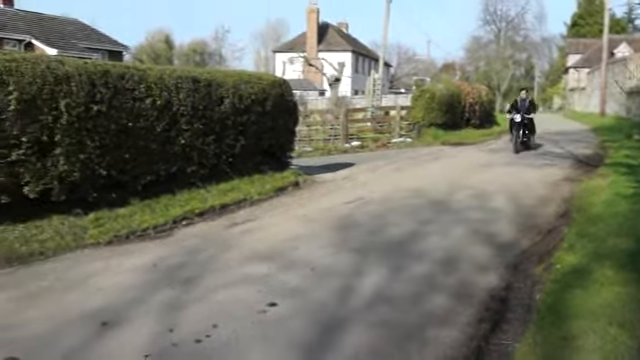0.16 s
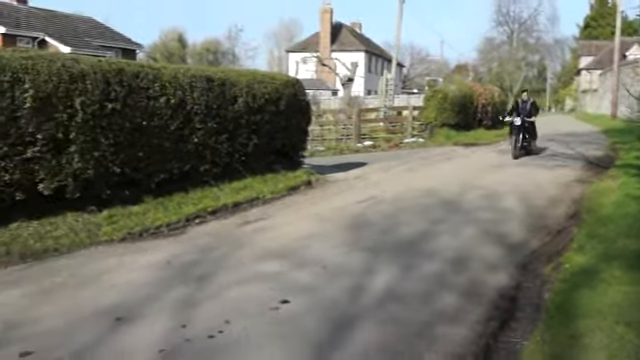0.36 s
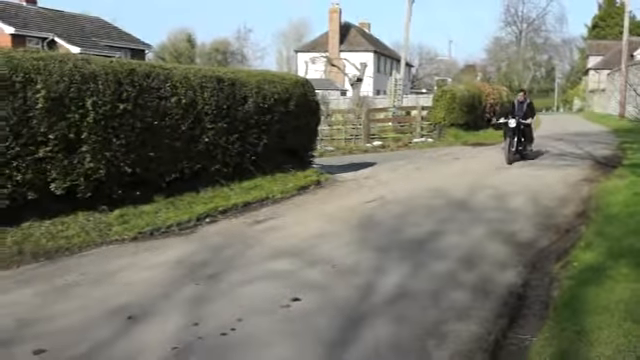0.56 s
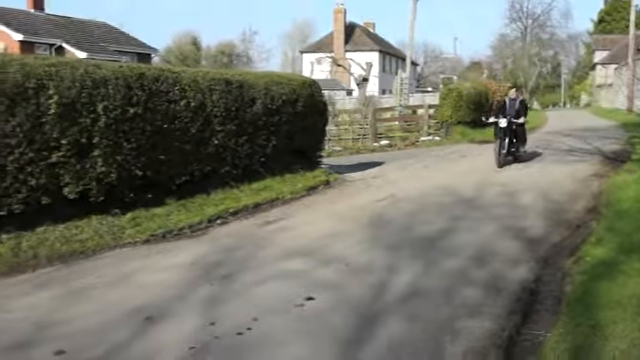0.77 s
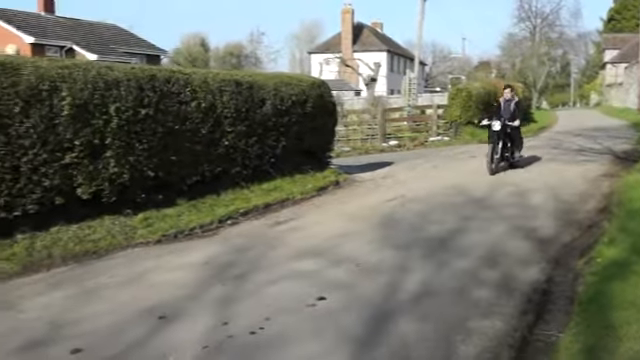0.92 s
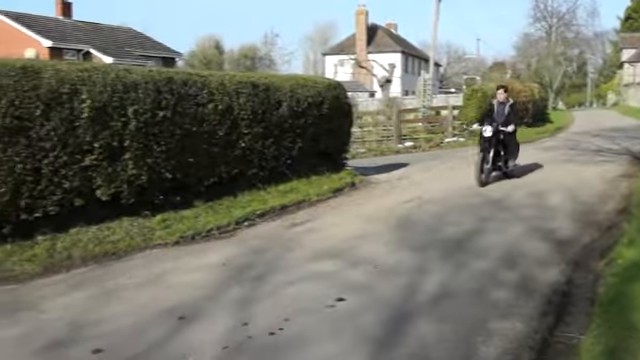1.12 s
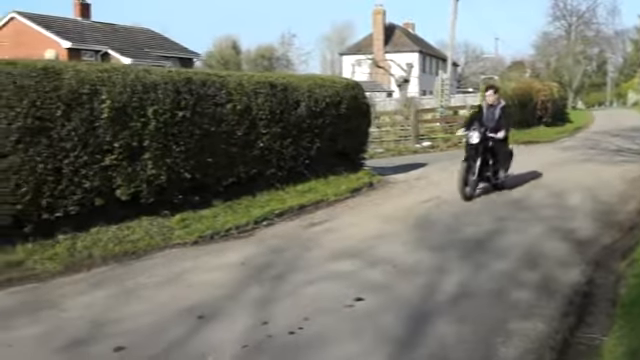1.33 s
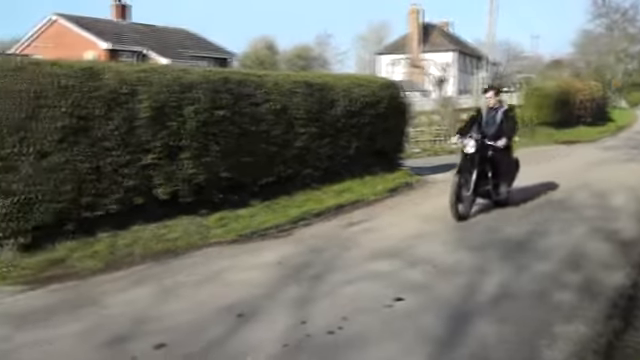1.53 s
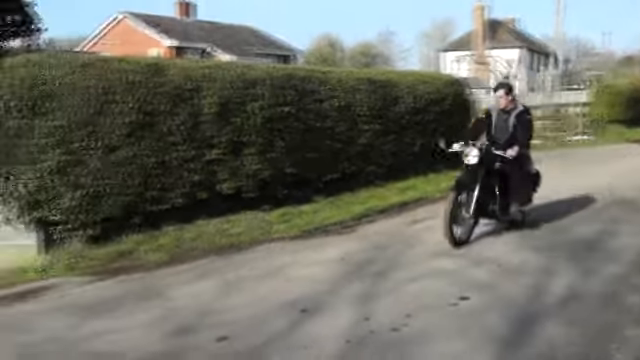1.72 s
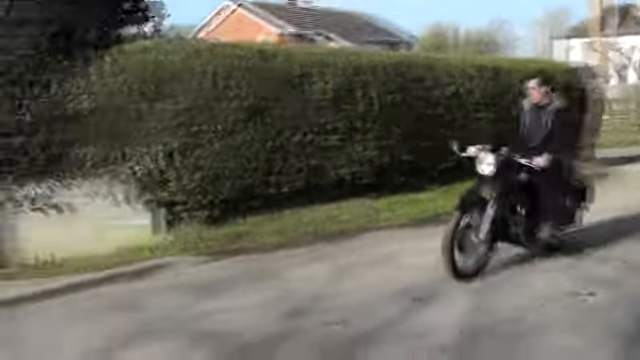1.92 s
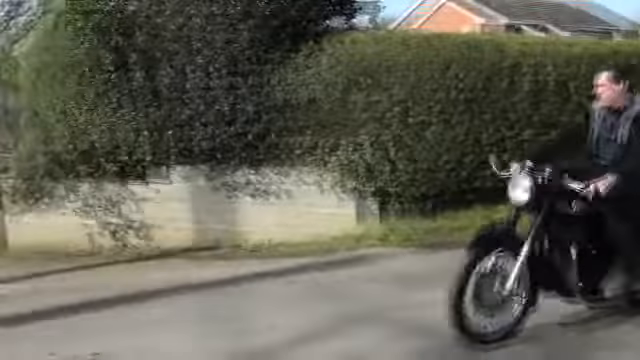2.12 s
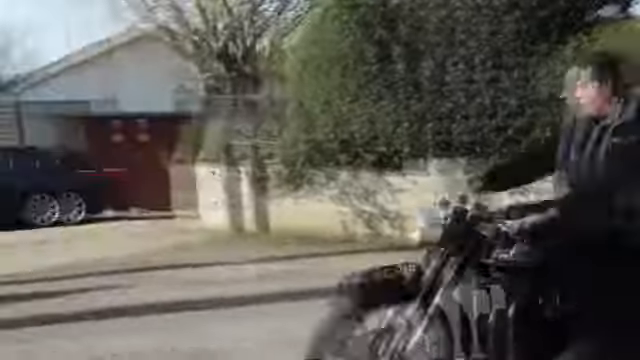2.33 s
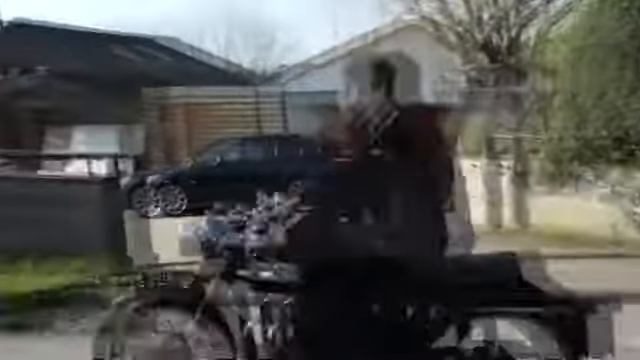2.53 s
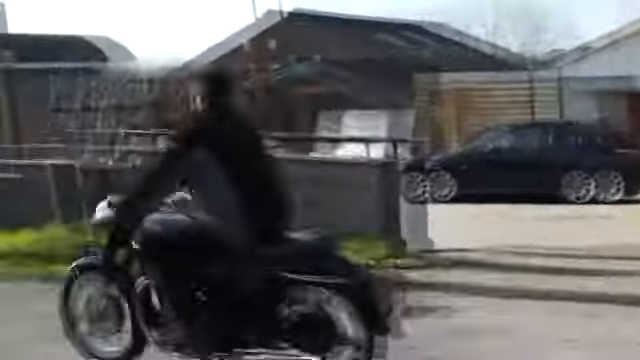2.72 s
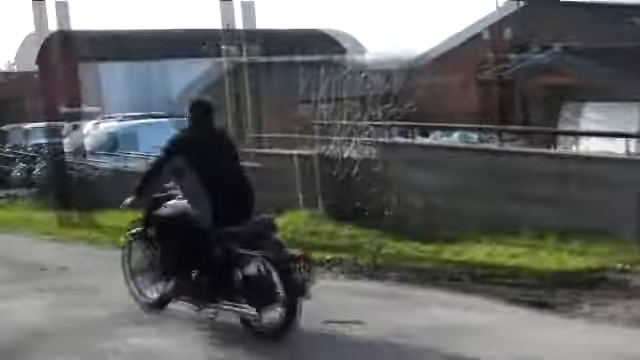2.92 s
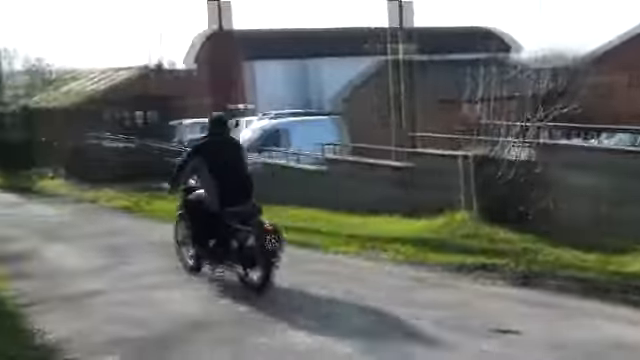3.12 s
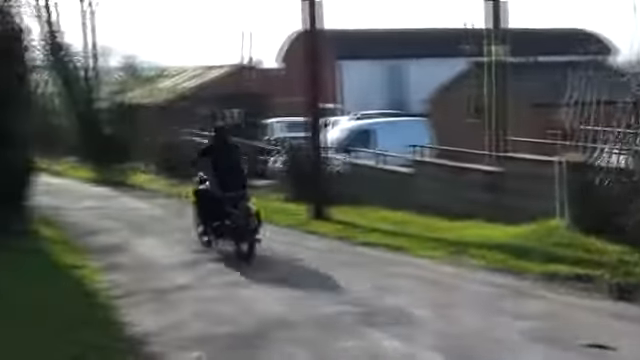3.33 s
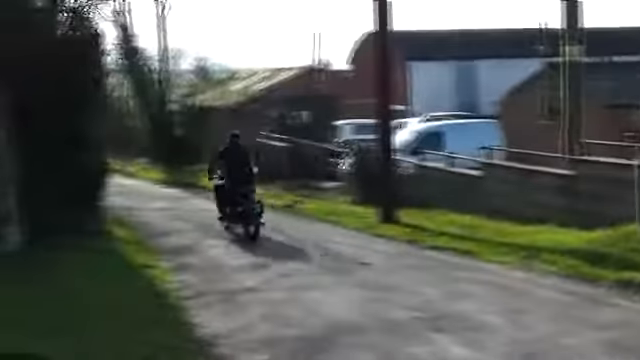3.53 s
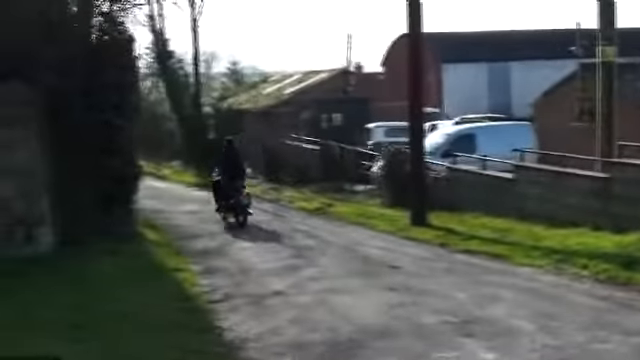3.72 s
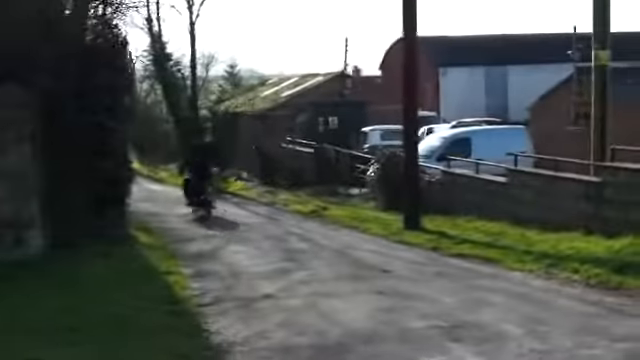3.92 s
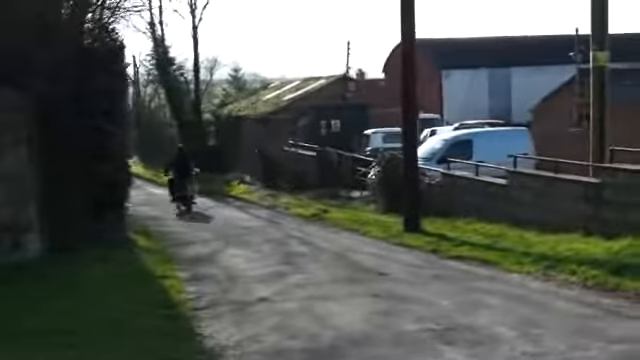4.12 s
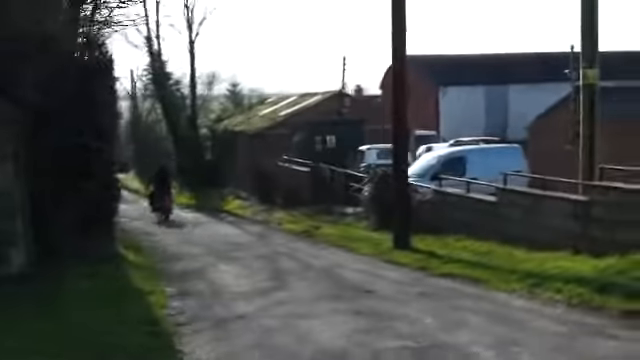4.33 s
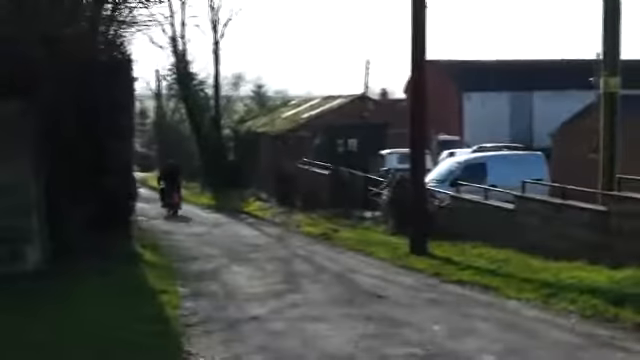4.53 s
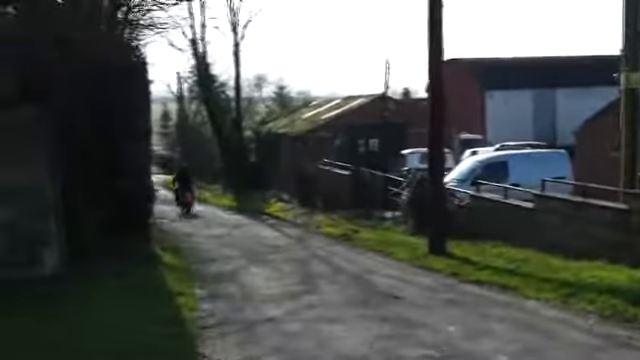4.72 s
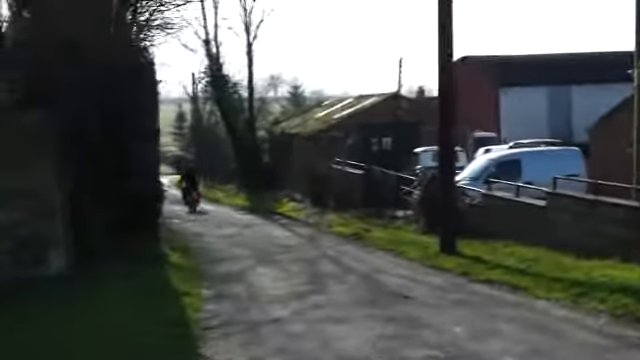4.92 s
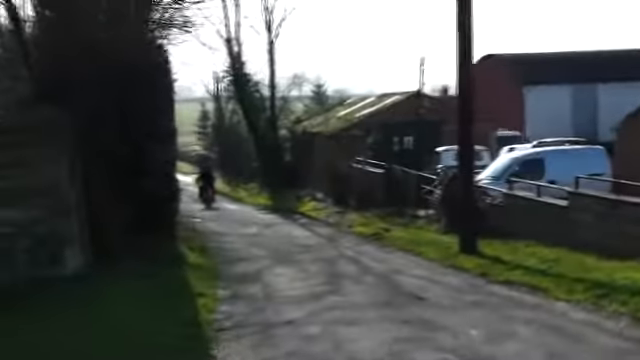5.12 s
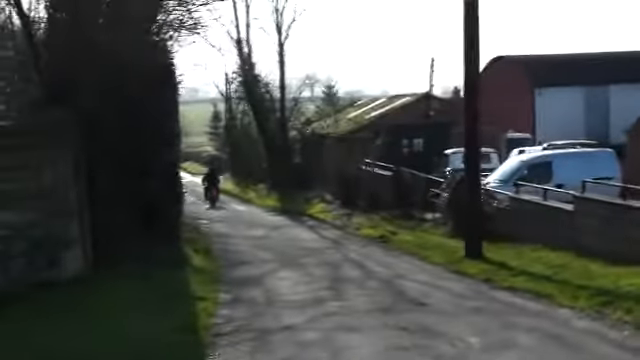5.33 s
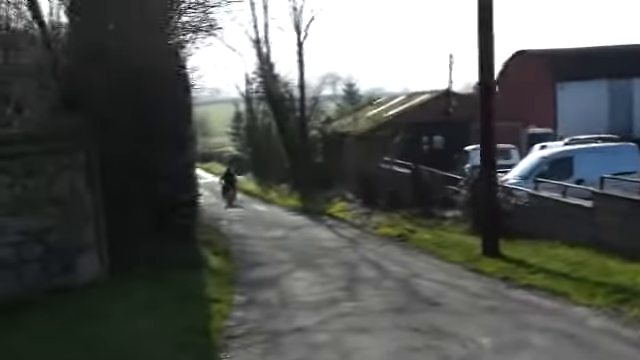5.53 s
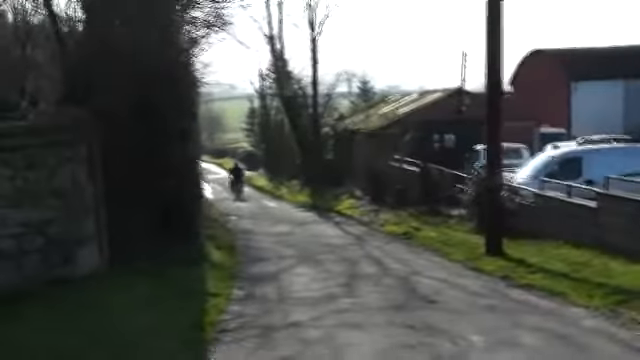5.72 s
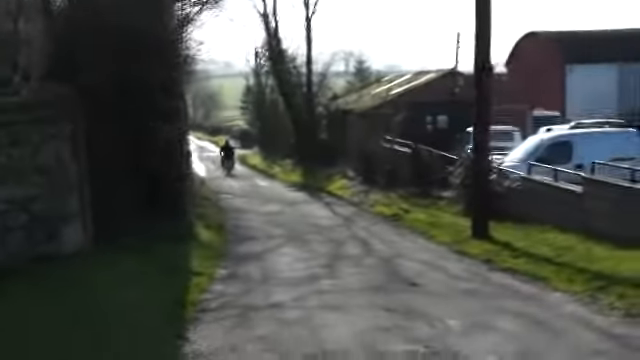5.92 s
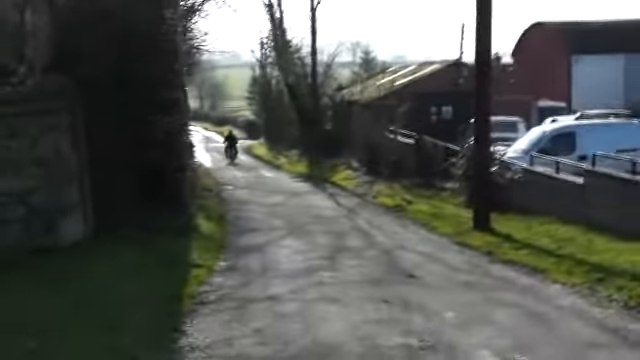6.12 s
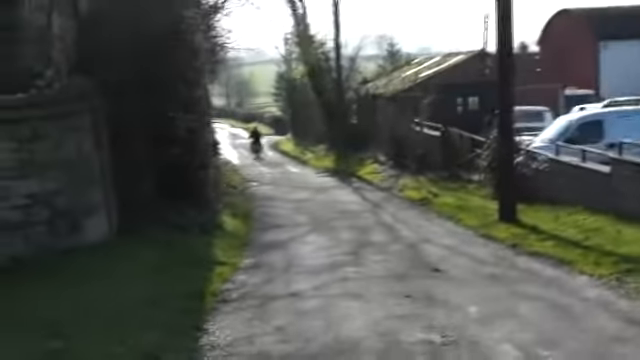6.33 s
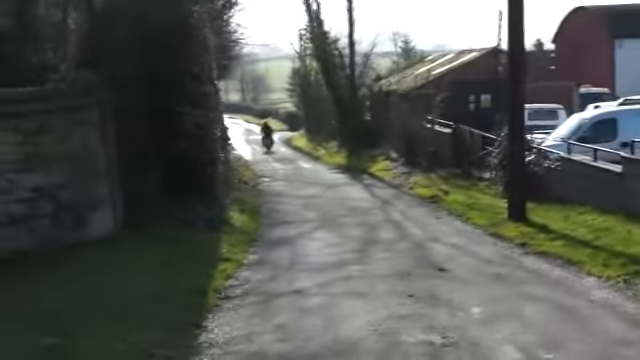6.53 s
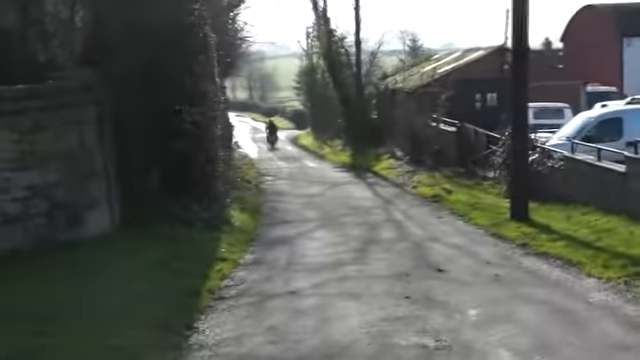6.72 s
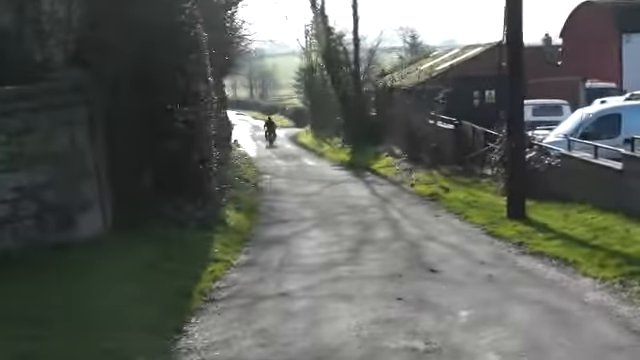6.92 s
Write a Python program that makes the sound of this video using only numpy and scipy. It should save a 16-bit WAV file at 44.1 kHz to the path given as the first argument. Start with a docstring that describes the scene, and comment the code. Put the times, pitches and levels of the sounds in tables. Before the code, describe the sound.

A vintage motorcycle with a deep, uneven twin beat rides toward a roadside microphone, metallic clatter and intake hum growing. It passes loudest at close range, drops in revs while changing gear, then barks with raspy exhaust as it pulls away. Throttle eases and the putter recedes with dull echoes from hedges and walls. Early wind rumble dies down; distant exhaust pops come last over quiet country air.

```python
"""An old twin-cylinder motorcycle accelerates along a country lane, changes gear as it passes close by,
pulls briefly, then coasts away; far off the exhaust pops as the engine is blipped. Firing pulses excite
the exhaust, air box and casing resonances, set by throttle and distance. A gusty, waning breeze of coloured
noise buffets the microphone, with a few dry knocks over a steady hush."""
import sys
import numpy as np
from scipy import signal
from scipy.fft import rfft, irfft, next_fast_len
from scipy.io import wavfile
from scipy.ndimage import uniform_filter1d

SR = 44100
rng = np.random.default_rng(int(sys.argv[2]) if len(sys.argv) > 2 else 0)


def inscribe(sig):
    """Save sig as 16-bit PCM at rate SR to the path in sys.argv[1].

    A 1-D sig is mono; a 2-D sig holds one channel per row.
    Samples are clipped to [-1, 1] before scaling.
    """
    pcm = np.round(np.clip(np.atleast_2d(sig).T, -1, 1) * 32767)
    wavfile.write(sys.argv[1], SR, pcm.astype(np.int16))


N = 311346
TIME = np.arange(N) / SR

# left-right correlation of the motorcycle's noise: frequency_hz, likeness (0-1)
BIKE_LIKENESS = [(200, .7), (1000, .6), (3000, .68), (8000, .64), (12000, .66)]
ROUND_TRIP_S = 0.0123  # a pulse runs down the exhaust pipe and back
THROTTLE_MOVE_S = 0.037


def from_db(db):
    """Decibels to amplitude gain: 20 dB per factor of ten."""
    return 10 ** (np.asarray(db) / 20)


def in_time(rows):
    """Linear interpolation: each column of a curve at every sample."""
    s, *columns = np.transpose(rows)
    return [np.interp(TIME, s, column) for column in columns]


def at_hz(points, hz):
    """A spectrum interpolated on a logarithmic frequency axis."""
    points = np.array(points)
    return np.interp(np.log(hz + 1), np.log(points[:, 0]), points[:, 1])


def levelled(x, size=6000):
    """Gain normalization: holds the running rms near 1, leaving the single beats intact."""
    power = uniform_filter1d(uniform_filter1d(x * x, size), size)
    return x / np.sqrt(np.abs(power) + 1e-14)


def ring(x, hz, width_hz):
    """A damped resonator: a unit click starts a decaying sine of initial height about 1."""
    radius = np.exp(-np.pi * width_hz / SR)
    angle = 2 * np.pi * hz / SR
    return signal.lfilter([0, np.sin(angle)], [1, -2 * radius * np.cos(angle), radius ** 2], x + 1e-18)


def body(x, modes):
    """Modal superposition: resonances in parallel."""
    return sum(from_db(db) * ring(x, hz, width_hz) for hz, width_hz, db in modes)


def fade(clicks, seconds):
    """Exponential decay: each click becomes a dying envelope."""
    return signal.lfilter([1], [1, -np.exp(-1 / (seconds * SR))], clicks + 1e-18)


def burst(clicks, seconds, rise_s=0.0014):
    """Two decays in cascade: each click becomes an envelope that swells quickly and dies."""
    return fade(fade(clicks, rise_s), seconds) / (rise_s * SR)


def bell(s, length_s):
    """A Gaussian swell of height 1 around a moment."""
    return np.exp(-(2 * (TIME - s) / length_s) ** 2)


def cut(x, hz, kind, order=2):
    """Butterworth filtering, low- or high-pass."""
    return signal.sosfilt(signal.butter(order, hz, kind, fs=SR, output="sos"), x)


def delayed(x, seconds):
    """Propagation delay: the sound arrives later."""
    return np.interp(TIME - seconds, TIME, x, left=0)


def drift(rate_per_s):
    """Slow random fluctuation with a spread near 1, interpolated between random knots."""
    knots = rng.standard_normal(4000)
    return np.interp(TIME * rate_per_s, np.arange(len(knots)), knots) * np.sqrt(3 / 2)


def noise(spectrum, likeness):
    """Spectrally shaped noise of rms 1; mid and side shares set the left-right correlation."""
    size = next_fast_len(N)
    hz = np.arange(size // 2 + 1) * SR / size
    mid, side = rfft(rng.standard_normal((2, size))) * from_db(at_hz(spectrum, hz))
    alike = np.clip(at_hz(likeness, hz), -1, 1)
    channels = np.sqrt(1 + alike) * mid + np.sqrt(1 - alike) * side * [[1], [-1]]
    x = irfft(channels, size)[:, :N]
    return x / x.std()


def beats(turns, uneven_db):
    """A pulse train: one click of randomly varying strength as each whole turn is completed."""
    at = np.flatnonzero(np.diff(np.floor(turns)) > 0)
    clicks = np.zeros(N)
    clicks[at] = from_db(uneven_db * rng.standard_normal(2000)[:len(at)])
    return clicks


def hush():
    """Steady ambient noise of the countryside, spectrally shaped."""
    # ambient spectrum: frequency_hz, level_db (per Hz, relative)
    hush_colour = [(40, 6), (150, -10), (380, -11), (540, 9.5), (800, -4), (1400, -3.5), (2500, -11.5),
                   (5000, -20), (9000, -23.5), (13000, -36)]
    return from_db(-55) * noise(hush_colour, BIKE_LIKENESS)


def wind_strength():
    """Power addition: a wavering breeze with bell-shaped gusts."""
    # strength of the breeze, which dies down: time_s, level_db (relative)
    breeze_levels = [(0, -27.5), (.23, -26), (.275, -36), (.31, -26), (.6, -24.5), (1.15, -28), (1.21, -36),
                     (1.26, -28), (1.45, -29.5), (1.6, -34), (2.4, -35), (3.4, -36), (3.72, -33),
                     (4.4, -40), (4.6, -50.5), (5.7, -53), (7.06, -57)]
    # gusts on top of the breeze: peak_s, length_s, level_db (relative)
    gust_list = [(0.055, 0.025, -22.5), (0.173, 0.1, -24), (0.242, 0.021, -24.5), (0.299, 0.01, -18),
                 (0.353, 0.086, -24), (0.437, 0.022, -18.5), (0.54, 0.049, -39), (0.642, 0.033, -22.5),
                 (0.728, 0.067, -22), (0.793, 0.017, -18), (1.136, 0.036, -23), (1.32, 0.13, -26.5),
                 (3.535, 0.15, -29), (4.108, 0.061, -35), (4.472, 0.089, -36), (4.752, 0.047, -46),
                 (5.04, 0.14, -43), (5.32, 0.087, -38.5), (5.49, 0.11, -42.5), (5.65, 0.16, -47.5),
                 (5.77, 0.049, -43), (6.063, 0.022, -47.5), (6.285, 0.045, -52), (6.573, 0.062, -46.5),
                 (6.808, 0.14, -46)]
    breeze = from_db(in_time(breeze_levels)[0] + 1.5 * drift(13))
    gust_power = sum(from_db(db) ** 2 * bell(s, length_s) for s, length_s, db in gust_list)
    return np.sqrt(breeze ** 2 + gust_power)


def wind(lumpy_db=2.5, turbulent_db=-36):
    """Turbulence: light air only rumbles on the microphone ports; gusts break into brighter, lumpy eddies."""
    # eddies of strong gusts: frequency_hz, level_db (per Hz, relative)
    eddy_colour = [(20, -26), (45, -14), (80, -10), (140, -2), (230, -0.5), (330, 0.5), (480, -4.5),
                   (680, -12), (1000, -22), (2000, -32), (4000, -45), (10000, -103)]
    # light air on the microphone ports: frequency_hz, level_db (per Hz, relative)
    rumble_colour = [(20, -35), (50, -4), (90, 1.5), (160, 0.5), (260, 1), (400, -21.5), (800, -45),
                     (3000, -76)]
    # left-right correlation of the wind: frequency_hz, likeness (0-1)
    wind_likeness = [(30, 0.2), (80, 0.93), (160, 0.9), (300, 0.09), (3000, 0)]
    strength = wind_strength()
    broken = strength / (strength + from_db(turbulent_db))  # share that turns to eddies
    lumps = from_db(lumpy_db * np.array([drift(90), drift(90)]))
    eddies = from_db(4.5) * np.sqrt(broken) * noise(eddy_colour, wind_likeness)
    rumble = from_db(6.5) * (1 - broken) * noise(rumble_colour, wind_likeness)
    return strength * lumps * (eddies + rumble)


def knocks():
    """Impulsive noise: short dry taps on the microphone housing, each with its own low-pass limit."""
    # taps: start_s, level_db (relative), top_hz
    taps = [(0.381, -11.5, 2500), (0.436, 5, 1310), (5.972, -39, 9000), (6.276, -50, 9000),
            (6.54, -38, 7000), (6.638, -35.5, 7000)]
    out = np.zeros(N)
    for s, db, top_hz in taps:
        decay = np.exp(-np.arange(800) / (0.0012 * SR))
        tap = from_db(db) * decay * rng.standard_normal(800)
        out[int(s * SR):][:len(tap)] += 0.5 * cut(tap, top_hz, "low", order=3)
    return out


def lane(x):
    """Multiple reflection: faint, dull echoes from walls and hedges, different on each side."""
    dull = cut(x, 1530, "low", order=1)
    delays_s = rng.uniform(0.018, 0.13, (2, 6))
    return np.array([sum(delayed(dull, s) * np.exp(-s / 0.13) for s in side) for side in delays_s])


def verge(x):
    """Early reflection: hedge and wall return the mid-range, in opposite polarity left and right."""
    back = delayed(cut(cut(x, 337, "high"), 1360, "low"), 0.011)
    return from_db(-7.5) * back * np.array([[1], [-1]])


def wake():
    """Turbulent flow noise: the air dragged behind the bike swells and fades at the microphone."""
    # peak_s, length_s, level_db
    s, length_s, db = (2.87, 0.2, -27)
    # wake spectrum: frequency_hz, level_db (per Hz, relative)
    wake_colour = [(150, -27), (320, -3), (450, 1), (620, -2), (830, -1), (1050, -17), (1800, -28),
                   (5000, -53)]
    return from_db(db) * bell(s, length_s) * noise(wake_colour, BIKE_LIKENESS)


def pops():
    """Impulse excitation: unburnt mixture thumps and cracks in the pipe, and each pop leaves a lingering tail
    near 550 Hz."""
    # exhaust pops: start_s, thump_db (relative), treble_db (crack against thump)
    pop_list = [(6.684, -26.5, 0.5), (6.7205, -34.5, 6), (6.755, -28, -3), (6.784, -32, 6)]
    # resonances struck by a pop: frequency_hz, width_hz, level_db (relative)
    pop_modes = [(247, 59, 6.5), (550, 52, -11), (1130, 230, -6.5)]
    thumps, cracks = np.zeros((2, N))
    for s, db, treble_db in pop_list:
        at = int(s * SR)
        thumps[at] = from_db(db)
        cracks[at] = from_db(db + treble_db)
    crack_envelope = 0.5 * fade(cracks, 0.006) + 0.025 * fade(cracks, 0.033)
    crack = crack_envelope * cut(rng.standard_normal(N), 1560, "low", order=1)
    tail_tone = levelled(ring(rng.standard_normal(N), 552, 41))
    tail = from_db(-28) * fade(thumps, 0.2) * tail_tone
    return crack + tail - body(thumps, pop_modes)


def nearness_db():
    """Inverse-distance spreading loss on a straight pass, relative to the closest point."""
    pass_s, closest_m, road_m_per_s = 2.304, 2.426, 7.79
    distance_m = np.hypot(closest_m, road_m_per_s * (TIME - pass_s))
    return 20 * np.log10(closest_m / distance_m)


def throttle():
    """Piecewise control: the engine settles quickly into each setting, then swells or sags until the next."""
    # settings before spreading loss, levels relative: start_s, exhaust_db, boom_db, clatter_db,
    # engine_swell_db_per_s, boom_swell_db_per_s, hiss_db (against clatter), second_cylinder_db (against first),
    # pipe_echo_share (0-1), crack_db (each firing over the clatter), snap_db (peak)
    settings = np.array([(0.0, -40, -18, -38, 4, -8, -8, -14, 0.1, -4, -30),
                         (0.45, -15.5, -17, -26.5, -4, -3, -12.5, -10, 1, 0, -28),
                         (0.79, -18, -23, -32, 2, 0, -15, 2, 0.4, -5, -26),
                         (0.87, -17.5, -22.5, -29.5, -1.5, 1, -11.5, -3, 0.53, -11, -21),
                         (1.995, -18, -30, -29.5, -14, -11, -9.5, 6.5, 0.18, 5.5, -2),
                         (2.461, -26, -21, -33.5, 19, 15.5, -13.5, -2, 0.03, 4, -35.5),
                         (2.935, -11, -24.5, -26.5, 1.5, 6.5, -8.5, -0.5, 0.25, 15, -11.5),
                         (3.412, -8.5, -13.5, -21.5, 1, 9, -10, -2, 0.44, 7.5, 2),
                         (3.612, -20.5, -30, -31, 6, -9, -11.5, -15, 0.66, 6.5, -20),
                         (3.84, -18.5, -27, -28.5, -10, 15, -8.5, -16, 0.3, 7.5, -1.5),
                         (4.16, -29, -19.5, -32.5, -1, -25, -12, -17, 0.2, 7, -9),
                         (4.55, -35, -30, -35, -1, -6, -13, 2, 0.2, 8, -16),
                         (4.66, -38, -22, -33.5, -23, -15, -15.5, -2, 0.2, 8, -31),
                         (6.68, -25, -23, -27, -23, -4, -14, 3, 0.3, 8.5, -33)])
    current = settings[np.searchsorted(settings[1:, 0], TIME)].T
    start_s, exhaust_db, boom_db, clatter_db, swell, boom_swell, *character = current
    held_s = TIME - start_s
    levels = [exhaust_db + swell * held_s, boom_db + boom_swell * held_s, clatter_db + swell * held_s]
    return uniform_filter1d(np.array(levels + character), int(THROTTLE_MOVE_S * SR), axis=1)


def fins(cycle):
    """Lightly damped resonance: the cooling fins ring thinly, stirred by the valves."""
    # cooling fins: frequency_hz, width_hz, level_db (relative)
    fin_modes = [(2400, 26, 4), (2680, 40, -13), (2804, 32, -1.5), (3014, 22, -5), (3540, 51, 5),
                 (4877, 84, -0.5)]
    stir = fade(beats(4 * cycle, uneven_db=11.5), 0.0084) + 0.3
    return levelled(body(stir * rng.standard_normal(N), fin_modes))


def spit(cracks):
    """Jet noise: the gas tears at the tailpipe in a short swell, coloured differently at every firing."""
    out = 0
    swell = signal.windows.hann(int(0.008 * SR))
    for hz in np.geomspace(1350, 6000, 8):
        strength = from_db(7 * rng.uniform(-1, 1, N))
        tear = signal.oaconvolve(cracks * strength, swell, "same") * rng.standard_normal(N)
        out = out + ring(tear, hz, width_hz=350) * (1350 / hz) ** 0.71
    return delayed(out, 0.002)


def rasps():
    """Narrow-band noise bursts: the hardest firings of the pull tear with a pitch of their own."""
    # hard firings: peak_s, length_s, level_db (before the high-pass), pitch_hz
    hard_firings = [(3.022, .005, -29, 3400), (3.218, .005, -26, 2820), (3.263, 0.0037, -28, 5600),
                    (3.317, 0.0045, -25, 2600), (3.369, 0.0042, -23.5, 2900), (3.418, 0.0045, -30.5, 7100),
                    (3.472, 0.0076, -23, 3680), (3.49, .01, -32, 4050), (3.524, 0.0069, -23.5, 3720),
                    (3.581, 0.014, -36, 4760)]
    out = 0
    for s, length_s, db, hz in hard_firings:
        tear = ring(rng.standard_normal(N), hz, width_hz=650)
        out = out + from_db(db) * bell(s, length_s) * tear / tear.std()
    return cut(out, 1800, "high")


def machinery(cycle, cracks, crack_db, clatter_db, hiss_db):
    """Amplitude modulation: clatter and hiss swell with every firing and tick with the valves."""
    # clatter spectrum: frequency_hz, level_db (per Hz, relative)
    clatter_colour = [(150, -1.5), (270, 7), (380, 1), (570, 7.5), (820, 2), (1050, 0), (1400, -0.5),
                      (2000, 2), (2700, -2), (3600, -5.5), (4500, -14), (6000, -12.5), (9000, -34.5)]
    # hiss spectrum: frequency_hz, level_db (per Hz, relative)
    hiss_colour = [(2500, -9), (4200, 2.5), (5300, 0.5), (7000, -0.5), (9000, -2.5), (11500, -6.5),
                   (13000, -14.5), (14500, -63)]
    # ringing engine casing: frequency_hz, width_hz, level_db (relative)
    casing_modes = [(1440, 150, 6), (2690, 60, 7), (3054, 27, -4), (3740, 220, 8)]
    valves = fade(beats(4 * cycle - 0.2, uneven_db=2.0), 0.0018)
    bursts = from_db(crack_db) * burst(cracks, 0.0055) * 1.6
    clatter_swell = levelled(np.sqrt(1 + (0.091 * bursts) ** 2 + (0.39 * valves) ** 2))
    clatter = clatter_swell * noise(clatter_colour, BIKE_LIKENESS)
    hiss_swell = levelled(np.sqrt(1 + (0.72 * bursts) ** 2 + (1.74 * valves) ** 2))
    hiss = hiss_swell * noise(hiss_colour, BIKE_LIKENESS)
    # each firing also barks briefly in the open end of the silencer
    bark_tone = levelled(ring(bursts * rng.standard_normal(N), 1400, 400))
    bark = bark_tone * from_db(np.minimum(crack_db, 10) - 12.0)
    casing = from_db(-21) * levelled(body((valves + 0.095) * rng.standard_normal(N), casing_modes))
    tearing = from_db(-27.5 + crack_db) * spit(cracks)
    mixed = 0.89 * clatter + 0.78 * bark + casing + from_db(hiss_db) * hiss + tearing
    return from_db(clatter_db + 8.5) * mixed


def overrun(cycle):
    """Harmonic synthesis: with the throttle shut for the gear change, the overtones follow the engine speed."""
    # start_s, end_s, level_db
    start_s, end_s, db = (2.46, 2.93, -29)
    # overrun tones: firing_rate_multiple, level_db (relative)
    overrun_tones = [(3, -8), (4, -1), (5, -1), (6, 1.5), (7.5, -1), (8.5, -8)]
    shut = np.clip(np.minimum(TIME - start_s, end_s - TIME) / THROTTLE_MOVE_S, 0, 1)
    tones = 0
    for k, level_db in overrun_tones:
        strength = from_db(level_db + 0.89 * drift(30))
        tones = tones + strength * np.cos(4 * np.pi * k * cycle + rng.uniform(0, 2 * np.pi))
    return from_db(db) * shut * tones


def honk(cycle, rate):
    """Selective resonance: the air box hums on whichever engine overtones lie near its note."""
    note_hz, width_hz = 236, 30
    out = 0
    for k in (7, 9, 11):  # multiples of the four-stroke cycle rate
        detune = 2 * (k * rate / 2 - note_hz) / width_hz
        out = out + np.cos(2 * np.pi * k * (cycle - 0.02)) / np.hypot(1, detune)
    return out


def intake(cycle, second_share=0.22):
    """Cavity resonance: a gulp of air rings the air box, much harder for one cylinder."""
    # air box: frequency_hz, width_hz, level_db (relative)
    airbox_modes = [(250, 33, 7), (562.4, 24.6, 2), (656, 50, 6.5), (1303, 110, -1), (1423, 170, -5),
                    (2636, 200, 0)]
    # the far cylinder's lag brings out lines between the firing harmonics
    far_gulps = delayed(beats(cycle - 0.5, uneven_db=3.5), 0.0008)
    gulps = beats(cycle, uneven_db=0.5) + second_share * far_gulps
    air = gulps + 0.01 * fade(gulps, 0.0026) * rng.standard_normal(N)
    return levelled(cut(body(air, airbox_modes), 370, "high"))


def boom(cycle):
    """Harmonic radiation: the silencer booms at twice the firing rate, with weaker partials above."""
    # partials: firing_rate_multiple
    boom_multiples = [2, 3.5, 4, 4.5, 6]
    # their levels: level_db (relative)
    boom_levels = [0, -10, -13, -11, -20]
    partials = zip(boom_multiples, boom_levels)
    return -sum(from_db(db) * np.cos(4 * np.pi * k * (cycle - 0.02)) for k, db in partials)


def drone(cycle, rate):
    """Selective resonance: firing-rate multiples three and four grow near the silencer's note."""
    note_hz, width_hz = 136, 14
    out = 0
    for k in (3, 4):
        detune = 2 * (k * rate - note_hz) / width_hz
        out = out - np.cos(4 * np.pi * k * cycle) / np.hypot(1, detune)
    return from_db(-8) * delayed(out, 0.0027)


def snap(first, second):
    """Transient excitation: the steep front of each exhaust pulse is a short, dry snap."""
    tone = cut(ring(first + 0.083 * second, 1310, 1500), 2220, "low", order=4)
    return -delayed(tone, 0.0016)


def exhaust(firings, echo, puff_s=0.0011):
    """Pipe reflection: each firing's puff rings the pipe and returns inverted from its open end."""
    # exhaust pipe: frequency_hz, width_hz, level_db (relative)
    pipe_modes = [(110.4, 5.9, -12), (207, 48, 7), (281.2, 49, 0), (572, 142, 6), (1370, 1900, 8.5)]
    u = np.linspace(-1, 1, SR // 50 + 1) / 100 / puff_s  # time in puff lengths
    puff = (u * u - 1) * np.exp(-u * u / 2)
    puffs = signal.fftconvolve(firings, puff, "same")
    rough = firings + 0.012 * fade(firings, 0.0078) * rng.standard_normal(N)
    rings = cut(body(rough, pipe_modes), 99, "high", order=4)
    blast = cut(delayed(puffs, 0.002) - 0.17 * rings, 71.0, "high", order=3)
    return levelled(blast - echo * delayed(blast, ROUND_TRIP_S))


def motorcycle():
    """Periodic excitation: two cylinders fire in turn per four-stroke cycle; throttle and distance set levels."""
    # engine speed: time_s, firings_per_s
    speed = [(0, 35.77), (.6, 35.7), (.9, 38.2), (1.45, 41.9), (1.8, 45.7), (2.0, 48.0), (2.44, 55.0),
             (2.5, 51.5), (2.6, 46.0), (2.75, 38.2), (2.89, 30.8), (2.93, 33.8), (2.98, 40.0),
             (3.05, 42.85), (3.3, 38.96), (3.6, 38.48), (3.69, 31.45), (3.87, 38.5), (4.15, 35.8),
             (4.3, 35.75), (4.5, 34.6), (5.9, 29.01), (6.5, 29.94), (6.8, 34.54), (7.06, 28.44)]
    # bearing: time_s, left_minus_right_db
    bearing = [(0.0, -2), (0.04, -1.5), (0.37, -0.5), (1.71, -1.0), (2.24, -4.5), (2.58, -5), (2.81, 0.5),
               (3.23, -0.5), (3.42, 6), (4.07, 1), (4.58, 3.5), (7.06, 4)]
    (rate,), (pan_db,), near_db = in_time(speed), in_time(bearing), nearness_db()
    exhaust_db, boom_db, clatter_db, hiss_db, second_db, echo, crack_db, snap_db = throttle()
    cycle = np.cumsum(rate) / SR / 2
    first = beats(cycle, uneven_db=1.0)
    # one header pipe is a little longer than the other
    second = from_db(second_db) * delayed(beats(cycle - 0.5, uneven_db=3.0), 0.0006)

    # intake and fins face forward and are shadowed once the bike has passed
    passed = 0.5 + 0.5 * np.tanh((TIME - 2.48) / 0.012)
    shadow_db = 11.5 * passed
    # factors on near_db: level lost per dB of plain spreading
    intake_db = -20.5 + 1.6 * near_db - shadow_db
    fins_db = -34 + 1.27 * near_db - shadow_db
    honk_db = -21 + 1.7 * near_db
    pipe = exhaust(first + second, echo) + drone(cycle, rate)
    engine = from_db(exhaust_db + near_db) * pipe + from_db(intake_db) * intake(cycle)
    engine = engine + from_db(honk_db) * (1 - passed) * honk(cycle, rate)
    snaps = from_db(snap_db + near_db + 2.5 * drift(20)) * snap(first, second)
    booming = from_db(boom_db + near_db + 1.0 * drift(34)) * boom(cycle)

    cracks = first + 0.5 * second
    cracks = cracks + 0.7 * echo * delayed(cracks, ROUND_TRIP_S)
    metal = machinery(cycle, cracks, crack_db, clatter_db + 1.525 * near_db, hiss_db)
    # clatter and cracks sound wider while the bike is close
    far_side_db, near_side_db = -5, 0
    side_db = far_side_db + (near_side_db - far_side_db) * from_db(near_db)
    middle = metal.mean(0)
    metal = middle + from_db(side_db) * (metal - middle)
    front = from_db(fins_db) * np.array([fins(cycle), fins(cycle)])
    pan = from_db(pan_db * np.array([[0.5], [-0.5]]))
    bike = (engine + snaps + metal + front + rasps()) * pan
    # the farther the bike, the larger the share of echoes
    echoes = lane(bike.mean(0) * from_db(-10.0 - 0.12 * near_db))
    side_echo = verge(engine * from_db(-0.5 * np.maximum(near_db, -10)))
    return bike + booming + overrun(cycle) + echoes + side_echo


def scene():
    """Linear superposition of motorcycle, pops, knocks, breeze, wake and hush."""
    return motorcycle() + pops() + knocks() + wind() + wake() + hush()


def record(dry):
    """Band limiting and soft saturation: deep bass is shed, high peaks rounded and the top cut."""
    peak_limit = 0.77  # share of full scale
    rounded = peak_limit * np.tanh(cut(dry, 38.0, "high", order=1) / peak_limit)
    low_pass = signal.ellip(10, 0.2, 80, 14000, fs=SR, output="sos")
    return signal.sosfilt(low_pass, rounded)


dry = scene()
out = record(dry)
inscribe(out)
```